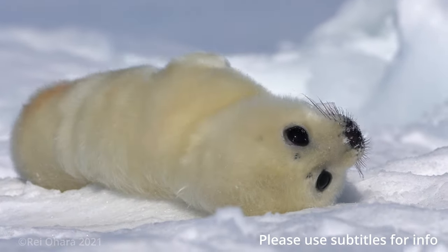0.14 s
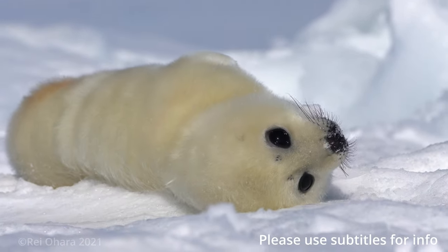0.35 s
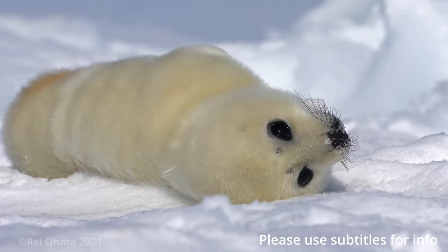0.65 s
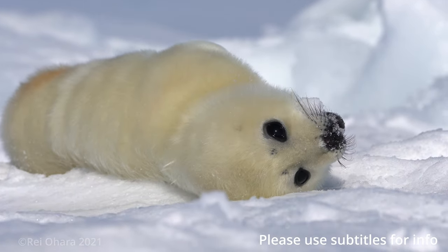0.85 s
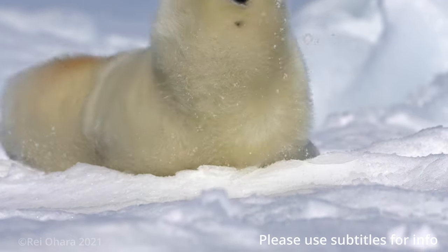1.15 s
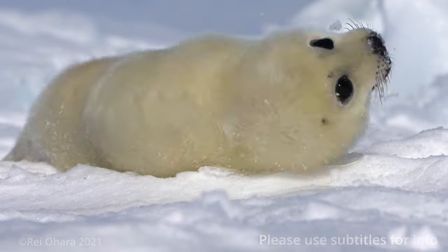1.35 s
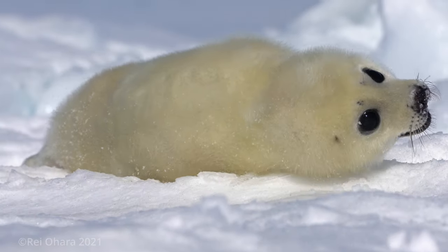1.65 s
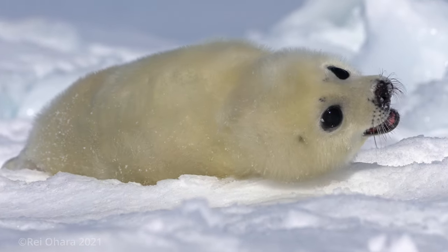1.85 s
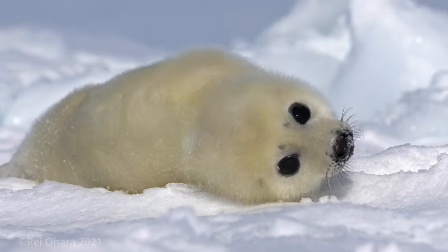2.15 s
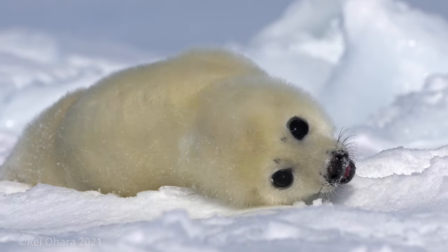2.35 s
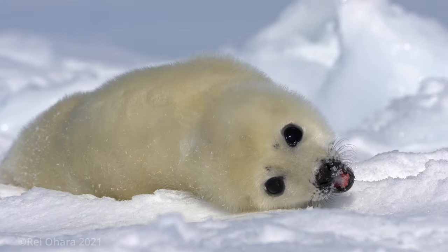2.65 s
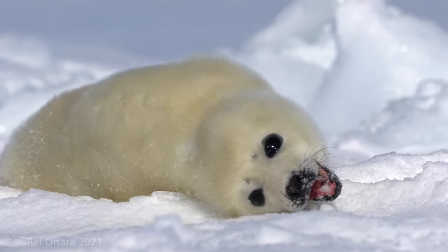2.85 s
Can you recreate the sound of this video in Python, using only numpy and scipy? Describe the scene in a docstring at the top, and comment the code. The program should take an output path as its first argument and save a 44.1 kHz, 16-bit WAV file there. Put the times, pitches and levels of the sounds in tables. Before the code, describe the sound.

A seal pup cries twice close by on open snowy ice, each cry rising from a low creak to a nasal wail. Wind rumbles on the microphone from the start, with faint rustles and tiny snow crunches.

```python
"""Open air, close to a seal pup lying on snowy ice. Wind buffets the microphone from the start with a low
rumble and a faint rustle, and after a second the snow crunches as the pup rolls. At 1.6 s it cries: its
vocal folds snap slowly in a low creak, then speed up to a nasal wail that cracks midway and drops to a
lower register at its end. The wind eases and gusts again, the snow crunches once more, and at 2.7 s
a second cry climbs from creak to wail."""
import sys
import numpy as np
from scipy import signal
from scipy.fft import rfft, irfft
from scipy.io import wavfile
from scipy.ndimage import uniform_filter1d

SR = 44100
rng = np.random.default_rng(int(sys.argv[2]) if len(sys.argv) > 2 else 0)


def dump(signal):
    """Clip the signal to [-1, 1] and save it as 16-bit WAV at the path in sys.argv[1]."""
    limited = np.clip(np.atleast_2d(signal).T, -1, 1)
    pcm = np.round(limited * 32767).astype(np.int16)
    wavfile.write(sys.argv[1], SR, pcm)


N = 132300
T = np.arange(N) / SR

# The vocal folds through each cry. Each row: time in seconds, pitch in Hz.
PITCH_1 = [(1.56, 215), (1.585, 235), (1.62, 337), (1.67, 372), (1.72, 411), (1.727, 376), (1.76, 418),
           (1.771, 398), (1.777, 432), (1.795, 407), (1.812, 428), (1.85, 444), (1.89, 443), (1.952, 476),
           (1.959, 325), (1.99, 286), (2.035, 320)]
PITCH_2 = [(2.661, 185), (2.67, 211), (2.705, 252), (2.716, 302), (2.773, 394), (2.8, 410), (2.85, 439),
           (2.89, 447), (2.925, 445), (3.0, 459)]
# The delivery of each cry. Each row: time in seconds, level in dB, mouth opening as a scale
# on the lower resonances, treble gain in dB.
EFFORT_1 = [(1.566, -59.5, 0.31, -22), (1.59, -52.5, 0.59, -10), (1.63, -46.5, 0.74, 2.5),
            (1.701, -39, 0.89, 1.5), (1.745, -35, 0.86, -6.5), (1.77, -37.5, 0.92, 13.5),
            (1.8, -36, 0.86, 8.5), (1.85, -34.5, 0.91, 3.5), (1.91, -35.5, 0.92, 5), (1.947, -37, 0.99, 17),
            (1.962, -42.5, 0.92, 10), (1.995, -47.5, 0.81, 12), (2.033, -70, 0.88, 15)]
EFFORT_2 = [(2.661, -48, 0.77, 12), (2.67, -35, 0.9, -4), (2.701, -32, 1.05, -1), (2.751, -34, 0.92, 5),
            (2.81, -33, 1.04, 3), (2.88, -33.5, 1.025, -2), (2.93, -34, 1.005, -6.5), (3.0, -33, 0.97, -9)]
# Throat and mouth resonances. Each row: frequency in Hz, relative level in dB.
THROAT_1 = [(150, -16), (420, -4.5), (620, -5.5), (880, -8.5), (1300, 4.5), (1750, 2.5), (2200, -3.5),
            (2600, -20.5), (3700, -22), (4300, -42), (5000, -34), (5700, -49), (6500, -37), (8200, -58),
            (15000, -62)]
THROAT_2 = [(150, -15.5), (430, -3.5), (650, -9.5), (950, -16.5), (1320, 1.5), (1800, 0.5), (2600, -8),
            (3050, -16.5), (4300, -23), (5200, -20.5), (6500, -30.5), (7300, -70), (8700, -50),
            (15000, -74)]
# Air rushing through the folds. Each row: frequency in Hz, relative level in dB.
BREATH_1 = [(1500, -9), (2500, 2), (5500, -15), (6600, -8), (8500, -29), (10000, -13), (11500, -12),
            (13000, -19), (14200, -13), (15800, -26)]
BREATH_2 = [(950, -16), (2500, 0), (4200, -14.5), (6600, -11), (7400, -29), (8500, -20), (11000, -27),
            (12600, -34), (14600, -32)]
# Where the voice cracks or frays. Each row: centre in seconds, half length in seconds, roughness 0-1.
VOICE_CRACKS = [(1.726, .005, .2), (1.776, .024, .6), (1.956, .007, .9), (2.008, .018, 1), (2.69, .03, .16),
                (2.95, .035, .13)]
# Wind on the microphone. Each row: time in seconds, rumble level in dB.
GUSTS = [(0, -32.5), (.17, -30), (.3, -30), (.44, -25), (.6, -26), (.82, -31), (1.04, -24.5), (1.2, -35),
         (1.3, -27.5), (1.38, -38), (1.46, -30.5), (1.66, -35), (1.84, -28), (2.0, -30), (2.1, -41),
         (2.3, -45.5), (2.37, -31.5), (2.69, -26), (2.77, -42), (3.0, -44.5)]
# The tone of the wind's rumble and rustle. Each row: frequency in Hz, relative level in dB.
RUMBLE_SPECTRUM = [(22, -24), (54, 2.5), (80, -2), (115, -5.5), (175, -14.5), (250, -21), (420, -35),
                   (800, -54), (2600, -115)]
RUSTLE_SPECTRUM = [(400, 10.5), (1200, 3.5), (1900, 4), (2500, -14), (4500, -28.5), (9000, -40)]
# Brief rustles right at the microphone. Each row: start in seconds, peak level in dB.
RUSTLE_BURSTS = [(0.217, -55.5), (.23, -56.5), (0.271, -60), (0.317, -64), (.495, -62), (0.598, -58.5),
                 (.778, -64), (0.864, -67), (0.933, -60), (0.972, -59), (1.042, -62), (2.048, -57),
                 (2.102, -65.5), (2.145, -65), (2.556, -56), (2.625, -58.5)]
# Snow under the pup. Each row: start in seconds, level in dB, decay in seconds, band centre in Hz.
CRUNCHES = [(1.091, -78, 0.032, 5940), (1.447, -71.5, 0.0096, 7000), (1.534, -66, 0.0018, 6950),
            (2.554, -67, 0.0089, 4230)]
# Steady background hiss. Each row: frequency in Hz, relative level in dB.
HISS_SPECTRUM, HISS_DB = [(1000, 3.5), (2000, -3), (4000, -9), (15000, -15)], -82

WAVER_SHARE, WAVER_HZ, TREBLE_HZ = .007, 65, 2860
JITTER_CYCLES, SHIMMER_DB, ROUGH_BREATH_DB = .05, 3, 10.5  # at a roughness of 1
PUFF_CYCLES, BREATH_FADE = 0.39, .35  # the fade is extra dB lost per dB below full effort
CREAK_BELOW_HZ, CREAK_RINGS_HZ, CREAK_WIDTH_HZ, CREAK_DB = 410, [1540, 2010], 270, 13


def seal_cry(pitch, effort, throat, breath, breath_db, drift_per_s, size=2048):
    """The pup, close up: each snap of its vocal folds rings the throat and lets a puff of air through."""
    inside = (T >= pitch[0][0]) & (T <= pitch[-1][0])
    waver = 1 + WAVER_SHARE * wander(WAVER_HZ)[inside]
    cycles = np.cumsum(columns_at(pitch, T[inside])[0] * waver) / SR
    snap_times = np.interp(np.arange(int(cycles[-1]) + 1), cycles, T[inside])
    middle_s, full_db = T[inside].mean(), max(row[1] for row in effort)
    hz, voice = np.fft.rfftfreq(size, 1 / SR), np.zeros(N)
    upper = 1 - 1 / (1 + (hz / TREBLE_HZ) ** 4)  # 0 in the bass, 1 in the treble
    for t in snap_times:
        level_db, mouth, treble_db = columns_at(effort, t)
        pitch_hz, rough = columns_at(pitch, t)[0], fold_roughness(t)
        jitter, shimmer = rng.standard_normal(2)
        onset = (t + rough * JITTER_CYCLES * jitter / pitch_hz) * SR
        # Lower resonances follow the mouth; upper ones glide through the cry.
        shifted_hz = hz / (mouth * (1 - upper) + upper * np.exp(drift_per_s * (t - middle_s)))
        # Slow folds stay shut longer, so the mouth rings harder.
        rings = sum(1 / (1 + ((shifted_hz - ring) / CREAK_WIDTH_HZ) ** 2) for ring in CREAK_RINGS_HZ)
        creak_db = CREAK_DB * max(1 - pitch_hz / CREAK_BELOW_HZ, 0) * rings
        tract = cavity(spectrum_db(throat, shifted_hz) + treble_db * upper + creak_db)
        snap = irfft(tract * np.exp(-2j * np.pi * hz / SR * (onset % 1)))  # lands between samples
        air = rng.standard_normal(size) * np.exp(-T[:size] * pitch_hz / PUFF_CYCLES)
        puff = irfft(cavity(spectrum_db(breath, shifted_hz) + creak_db) * rfft(air))
        puff_db = breath_db + ROUGH_BREATH_DB * rough + BREATH_FADE * (level_db - full_db)
        pulse = unit_rms(snap) * amp(rough * SHIMMER_DB * shimmer) + unit_rms(puff) * amp(puff_db)
        add(voice, int(onset), pulse * amp(level_db) * np.sqrt(SR / pitch_hz / size))
    return voice


def fold_roughness(t):
    """The folds are nearly regular except where the voice cracks."""
    return 0.043 + sum(rough * np.exp(-((t - centre) / half) ** 2) for centre, half, rough in VOICE_CRACKS)


def cavity(db):
    """Frequency response of a cavity with this spectrum, ringing only after it is excited."""
    log_gain = np.log(amp(db))
    return np.exp(np.conj(signal.hilbert(np.r_[log_gain, log_gain[-2:0:-1]])))[:len(db)]


def wind_rumble(swell_db=2.5, swell_hz=24):
    """Wind buffets the microphone: a lumpy low rumble that follows the gusts."""
    eddies = coloured_noise(RUMBLE_SPECTRUM)
    eddies /= np.sqrt(uniform_filter1d(eddies ** 2, size=3000))  # evened out, so the gusts set the level
    return eddies * amp(columns_at(GUSTS, T)[0] + swell_db * wander(swell_hz))


def wind_rustle(clump_db=6, clump_hz=100, below_gust_db=43, rise_s=0.0022):
    """A soft dull flutter at the microphone: clumps that come with the gusts, and brief louder bursts."""
    clumps = unit_rms(amp(clump_db * 2 * np.tanh(wander(clump_hz) / 2)))
    envelope = clumps * amp(columns_at(GUSTS, T)[0] - below_gust_db)
    for start, db in RUSTLE_BURSTS:
        add(envelope, round(start * SR), amp(db) * T / rise_s * np.exp(1 - T / rise_s))
    return coloured_noise(RUSTLE_SPECTRUM) * envelope


def snow_crunches(width_octaves=0.67, rise_s=0.0006):
    """The snow crust gives under the pup in short bright crunches."""
    snow, hz = np.zeros(N), np.fft.rfftfreq(N, 1 / SR)
    for start, db, decay_s, centre_hz in CRUNCHES:
        band = np.exp(-.5 * (np.log2((hz + 1) / centre_hz) / width_octaves) ** 2)
        envelope = np.minimum(T / rise_s, 1) * np.exp(-T / decay_s)
        add(snow, round(start * SR), shaped_noise(band) * amp(db) * envelope)
    return snow


def hiss_and_whine(whine_hz=14606, whine_db=-94):
    """Behind everything, a faint steady hiss and a thin high whine."""
    whine = amp(whine_db) * unit_rms(np.sin(2 * np.pi * whine_hz * T))
    return amp(HISS_DB) * coloured_noise(HISS_SPECTRUM) + whine


def shaped_noise(gains):
    """Noise of unit rms, weighted by a gain at each frequency."""
    return unit_rms(irfft(rfft(rng.standard_normal(N)) * gains, N))


def coloured_noise(spectrum):
    """Noise of unit rms with this spectrum, rolled off below its first row."""
    hz = np.fft.rfftfreq(N, 1 / SR)
    return shaped_noise(amp(spectrum_db(spectrum, hz)) * np.minimum(hz / spectrum[0][0], 1) ** 2)


def wander(rate_hz):
    """Smooth random motion of unit rms."""
    return shaped_noise(np.exp(-(np.fft.rfftfreq(N, 1 / SR) / rate_hz) ** 2))


def amp(db):
    """Decibels to gain."""
    return 10 ** (np.asarray(db) / 20)


def unit_rms(x):
    """Scales to unit rms."""
    return x / np.sqrt(np.mean(x ** 2) + 1e-20)


def columns_at(table, t):
    """Every value column of a time table at the times t."""
    times, *columns = np.transpose(table)
    return [np.interp(t, times, column) for column in columns]


def spectrum_db(spectrum, hz):
    """Levels at hz, interpolated on a log-frequency axis."""
    row_hz, db = np.transpose(spectrum)
    return np.interp(np.log(hz + 1), np.log(row_hz + 1), db)


def add(mix, start, sound):
    """Mixes a sound in from a sample index on."""
    part = mix[start:][:len(sound)]
    part += sound[:len(part)]


def scene():
    """One microphone on the open ice: two close cries over wind, snow and a faint background."""
    seal = seal_cry(PITCH_1, EFFORT_1, THROAT_1, BREATH_1, breath_db=-32, drift_per_s=-0.74)
    seal += seal_cry(PITCH_2, EFFORT_2, THROAT_2, BREATH_2, breath_db=-21, drift_per_s=0.076)
    background = hiss_and_whine()
    return (seal + wind_rumble() + wind_rustle() + snow_crunches() + background)[None]


def record(dry):
    """The recorder cuts off the treble above 15.8 kHz."""
    lowpass = signal.firwin(511, 15800, window=("kaiser", 9), fs=SR)
    return signal.oaconvolve(dry, lowpass[None], "same")


dry = scene()
out = record(dry)
dump(out)
```